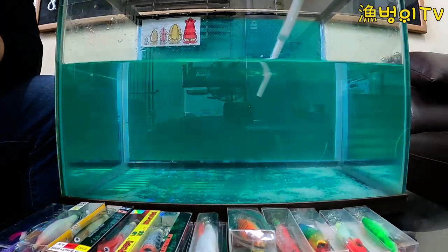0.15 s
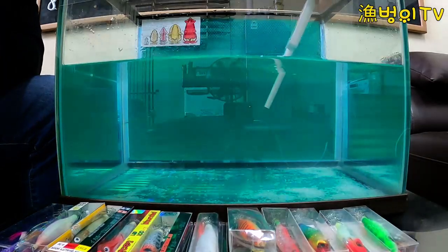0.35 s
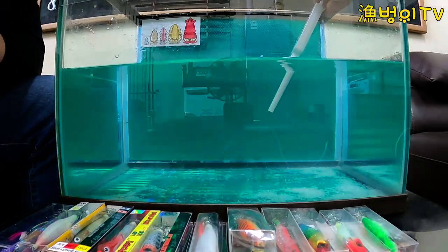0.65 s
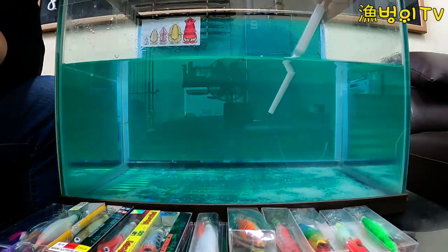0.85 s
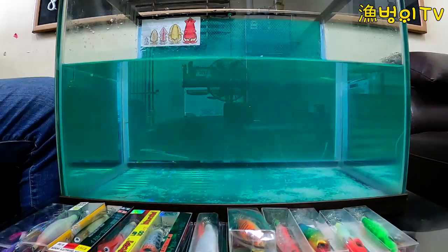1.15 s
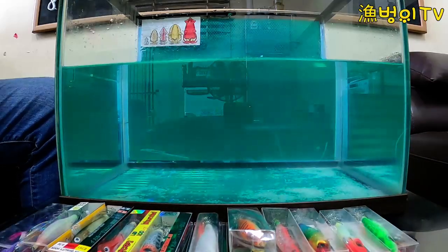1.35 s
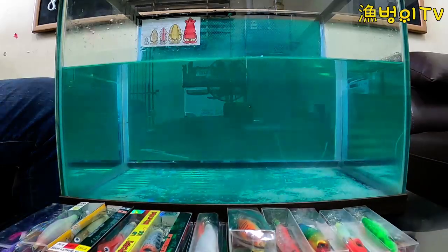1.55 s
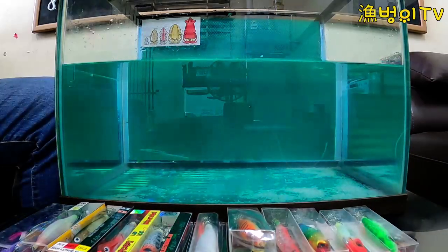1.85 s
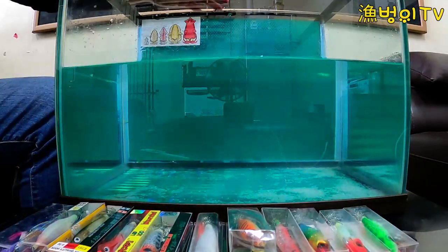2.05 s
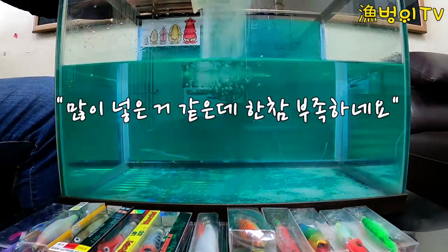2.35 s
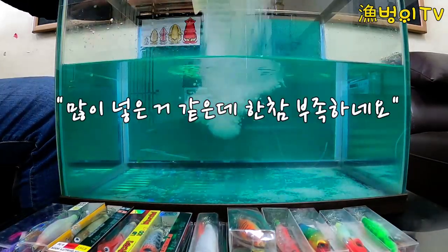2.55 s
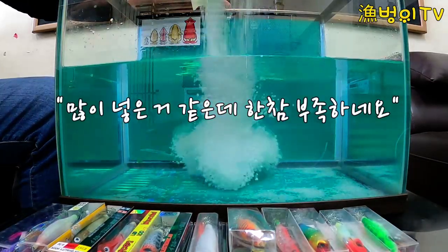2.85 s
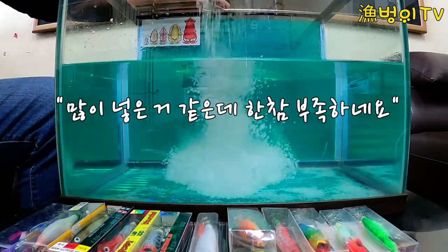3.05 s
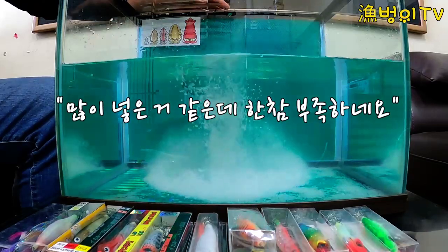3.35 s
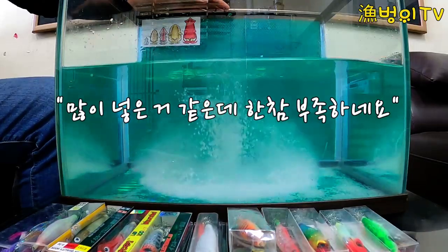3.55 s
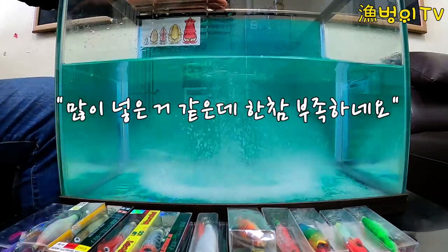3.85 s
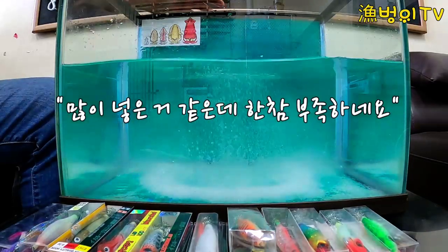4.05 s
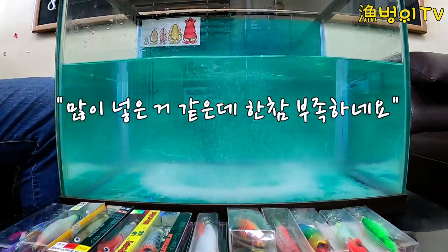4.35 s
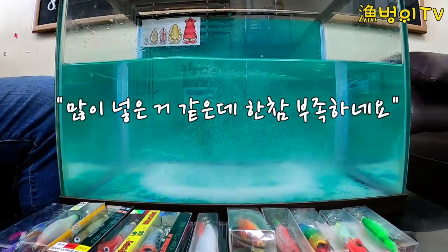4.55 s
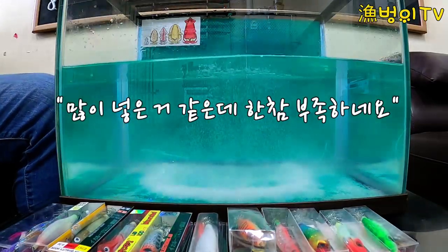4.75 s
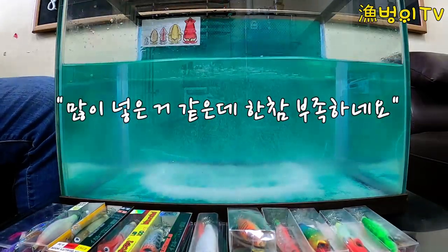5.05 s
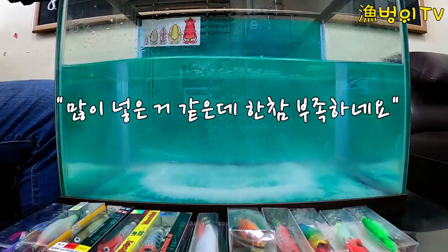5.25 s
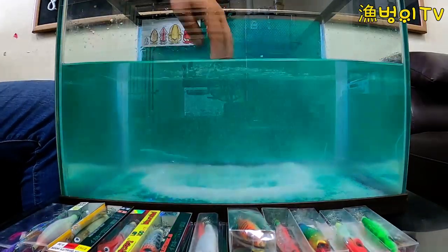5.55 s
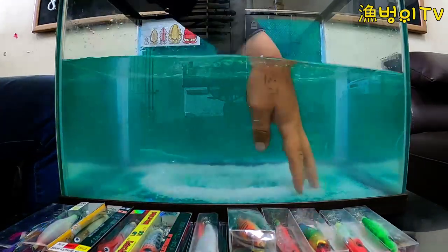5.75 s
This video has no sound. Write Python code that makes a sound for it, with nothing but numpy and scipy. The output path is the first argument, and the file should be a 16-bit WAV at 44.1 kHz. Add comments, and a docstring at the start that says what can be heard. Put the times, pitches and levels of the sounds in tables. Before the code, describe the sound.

Stiff paper knocks and rustles, then a rush of salt hisses into water with a few gulps, ending in two short shakes.

```python
"""Salt poured into water

Salt is tipped from a stiff paper container into a glass tank of water in a small room. Grain impacts fuse into
a hiss and drag down a few big bubbles, which ring as resonators; stray lumps tick, and the rest is shaken out.
The container rustles by friction and knocks in its own modes of vibration. The room rumbles and hums. Twice the
sound drops out for a moment."""
import sys
import numpy as np
from scipy import signal
from scipy.fft import rfft, irfft
from scipy.io import wavfile
from scipy.ndimage import uniform_filter1d

SR = 44100
rng = np.random.default_rng(int(sys.argv[2]) if len(sys.argv) > 2 else 0)


def output_pcm(signal):
    """Save a mono or channel-first signal as 16-bit PCM at the path in sys.argv[1].

    Samples are clipped to [-1, 1] before scaling.
    """
    pcm = np.clip(np.atleast_2d(signal).T, -1, 1) * 32767
    wavfile.write(sys.argv[1], SR, np.round(pcm).astype(np.int16))


N = 260190
TIME = np.arange(N) / SR
FREQS = np.maximum(np.arange(N // 2 + 1) * SR / N, 1)

POUR_START_S, SPLASH_S, POUR_EMPTY_S, POUR_END_S = 1.843, 2.1, 3.042, 3.8
# Spectral envelope of the falling stream: frequency_hz, gain_db
STREAM_SPECTRUM = [(150, -8), (500, -3), (950, -4.5), (1400, -1), (2700, -2), (5800, -3), (7800, -2.5),
                   (9000, -17.5), (10800, -23), (11600, -32.5), (13000, -28), (15500, -50)]
# Resonances of the churning bubble cloud: centre_hz, width_hz, gain_db
CLOUD_RESONANCES = [(575, 48, 7), (990, 43, -7), (1420, 45, 5.5), (1924, 450, 6), (2334, 250, 5),
                    (2640, 250, -2.5), (3430, 430, 5), (3930, 270, 5), (4500, 180, 2.5), (5750, 300, 1),
                    (6250, 450, -2), (6850, 280, 3)]
def stream(level_db=-23, trickle_db=-44.5, ping_db=-8.5, churn_db=-40, forerun_db=-2, inertia_s=0.39):
    """Superposition of impacts: fine grains fuse into hiss, coarse ones ping; trapped air churns."""
    tipped = surge(POUR_EMPTY_S, build_db_per_s=6.5, fall_db_per_s=54)
    tipped = uniform_filter1d(tipped, size=int(inertia_s * SR))
    flow = np.hypot(tipped, from_db(trickle_db - level_db))
    hits = grains(69000 * flow, spread_db=0, clump_db=1.1)
    hiss = colour(rms_one(hits) + from_db(ping_db) * pings(), STREAM_SPECTRUM)
    hiss = resonate(hiss, [(*peak, 0) for peak in CLOUD_RESONANCES], waver=0.015, size=1024)
    churn = from_db(churn_db) * flow ** 1.55 * noise_band(254, 296)
    gate = opening(POUR_START_S, fade_s=0.082) * (1 - opening(POUR_END_S))
    forerun = from_db(forerun_db * (1 - opening(SPLASH_S)))  # quieter ahead of the first mass of salt
    return gate * forerun * (from_db(level_db) * flow * hiss + churn)


def pings(count=14000, size=400, low_hz=1250, high_hz=8000, ring_cycles=24):
    """Bubble resonance: each coarse grain traps a tiny bubble that rings at its own pitch; rms 1."""
    when, pitch, strength = rng.random((count, 3)).T[:, :, None]
    cycles = (low_hz + pitch * (high_hz - low_hz)) * TIME[:size]
    height = strength ** 2 * np.sqrt(cycles[:, 1:2])  # offsets the shorter ring of high pitches
    waves = height * np.sin(2 * np.pi * cycles) * from_db(-60 * cycles / ring_cycles)
    at = (when * (N - size)).astype(int) + np.arange(size)
    return rms_one(np.bincount(at.ravel(), waves.ravel(), N))


# Resonances of the splash: centre_hz, width_hz, gain_db
SPLASH_RESONANCES = [(2040, 450, 9.4), (3780, 390, 11)]
def splash(level_db=-27):
    """Air entrainment: the first mass of salt breaks the surface and rings in two broad bands."""
    bubbles = colour(pings(), STREAM_SPECTRUM, SPLASH_RESONANCES)
    return from_db(level_db) * stroke(SPLASH_S, rise_s=0.026, t60_s=0.22) * bubbles


# Big bubbles dragged under: start_s, pitch_hz, level_db, t60_s
BIG_BUBBLES = [(1.894, 276, -24, 0.13), (1.924, 521, -18.5, 0.057), (2.135, 267, -25, 0.076),
               (2.748, 290, -18.5, 0.15), (2.809, 331, -19, 0.092)]
def gulps(chirp_per_s=0.39, swell_s=0.005):
    """Damped oscillation: big bubbles ring unsteadily, rising in pitch as they near the surface."""
    out = np.zeros(N)
    for start_s, pitch_hz, level_db, t60_s in BIG_BUBBLES:
        t = np.clip(TIME - start_s, 0, 1)
        envelope = from_db(level_db - 60 * t / t60_s) * (1 - np.exp(-t / swell_s))
        wobble = 0.6 * drift(70)
        out += envelope * np.sin(2 * np.pi * pitch_hz * t * (1 + chirp_per_s * t) + wobble)
    return out


# Spectral envelope of the last salt, also of lone grains and fizz: frequency_hz, gain_db
DREGS_SPECTRUM = [(150, -17), (500, -15), (1100, -3), (1600, 1.5), (3000, -3), (5700, -3.5), (7500, -5.5),
                  (9000, -17.5), (11000, -28.5), (11800, -37), (13000, -33), (15500, -50)]
# The mouth's resonances in the first shake: centre_hz, width_hz, gain_db, glide_hz_per_s
FIRST_MOUTH = [(947, 220, -13, 3), (1400, 360, -2, -500), (2340, 270, 1, -1500), (3380, 540, 4.5, -700),
               (4260, 420, -3.5, 0), (4900, 560, 4, -1500), (5800, 860, -5, 0), (6900, 610, 6, 1500)]
# The same, tipped further for the second: centre_hz, width_hz, gain_db, glide_hz_per_s
SECOND_MOUTH = [(890, 350, 5, -800), (1300, 950, -10.5, 0), (1800, 200, 6.5, -300), (2700, 380, 1.5, -1500),
                (4800, 400, -3, 0), (5400, 700, -2, 0), (6900, 750, 3, 9000)]
# Surges of shaken salt: peak_s, build_db_per_s, hold_s, hiss_db, relative_lows_db, sag_db_per_s
SHAKE_SURGES = [(3.972, 126, 0.078, -22, -6, 38.5), (4.156, 175, 0.097, -27, -4, 7)]
def shakes(crinkle_db=1.5, crinkle_hz=150):
    """Source and filter: two crinkling surges of salt are coloured by the container's flexing mouth."""
    out = np.zeros(N)
    for shake, mouth in zip(SHAKE_SURGES, (FIRST_MOUTH, SECOND_MOUTH)):
        peak_s, build_db_per_s, hold_s, hiss_db, lows_db, sag_db_per_s = shake
        sag = from_db(-sag_db_per_s * np.clip(TIME - peak_s, 0, hold_s))
        flow = sag * surge(peak_s, build_db_per_s, fall_db_per_s=131, hold_s=hold_s)
        hits = grains(50000 * np.maximum(flow, 0.1), spread_db=-0.5, clump_db=0.6)
        crinkle = colour(hits * from_db(crinkle_db * drift(crinkle_hz)), DREGS_SPECTRUM)
        salt = resonate(crinkle, mouth, waver=0.017, middle_s=peak_s + hold_s / 2)
        lows = from_db(lows_db) * rms_one(band(salt, 220, 1224))
        out += from_db(hiss_db) * flow * (rms_one(band(salt, 890, 20000)) + lows)
    return out


def dregs(level_db=-33):
    """Shot noise: a thin dribble, filtered by the mouth, runs on through both shakes."""
    hits = colour(grains(9000, spread_db=-0.5, clump_db=2.5), DREGS_SPECTRUM)
    dribble = resonate(hits, FIRST_MOUTH, waver=0.017, middle_s=SHAKE_SURGES[0][0])
    return from_db(level_db) * stroke(3.688, rise_s=0.16, t60_s=0.46, hold_s=0.47) * dribble


# Stray lumps of salt: start_s, level_db, t60_s, pitch_hz
LUMPS = [(3.4198, -21.5, 0.016, 6900), (3.432, -34, 0.044, 3200), (3.444, -32, 0.051, 2920),
         (3.5952, -36, 0.016, 4900), (3.639, -33, 0.025, 2030), (3.6735, -34, 0.024, 4770),
         (3.698, -30, 0.015, 6900), (3.7238, -38, 0.014, 4800), (3.7575, -36, 0.016, 6900)]
def ticks():
    """Impact transients: each stray lump makes a brief, and therefore broadband, tick."""
    return sum(burst(*lump, rise_s=0.00037, low_hz=1460, high_hz=7200) for lump in LUMPS)


def lone_grains(per_s=110, level_db=-50):
    """Sparse random impacts: single grains patter as the stream thins out."""
    hits = colour(grains(per_s, spread_db=0.5, clump_db=1), DREGS_SPECTRUM)
    gate = opening(POUR_EMPTY_S) * (1 - opening(POUR_END_S))
    return from_db(level_db) * gate * rms_one(band(hits, 2800, 7600, order=2))


# Knocks of the container:
# start_s, level_db, relative_thump_db, tilt_db_per_octave, thump_hz, pitch_ratio, relative_crack_db
CONTAINER_KNOCKS = [(1.111, -38, 19, -5, 240, 1.1, 0), (1.1462, -21, 3.5, 6.5, 380, 0.98, 0),
                    (1.2655, -30, 16, 3, 260, 1.1, 8), (1.281, -38, 17, 2, 175, 0.79, 0),
                    (1.3, -35.5, -10, 9, 400, 1.05, 4), (1.3146, -23, 0, 4.5, 500, 0.87, 10),
                    (1.404, -28, -16, -3, 400, 1.01, 10), (1.431, -25.5, 0.5, -2.5, 420, 0.93, 16),
                    (1.509, -26.5, -3, -2, 530, 1.05, 10), (1.660, -34.5, 14, 8, 310, 1.12, 6),
                    (1.776, -18.5, -4, 3.5, 520, 1, 4), (2.074, -17.5, 4.5, -10, 523, 0.94, 25),
                    (2.1062, -25, 16, 2, 221, .95, 8), (3.5075, -23, 7.5, 3, 590, 0.863, 27.5),
                    (3.5098, -28, 19, 3.5, 100, 0.99, 18), (4.7284, -34, -6, -10, 480, .8, 14)]
def knocks(wall_lag_s=0.0015):
    """Buckling and impact: a crease of the container clacks, and its wall answers with a thump."""
    out = np.zeros(N)
    for start_s, level_db, thump_db, tilt, thump_hz, pitch_ratio, crack_db in CONTAINER_KNOCKS:
        wall = from_db(thump_db) * thump(thump_hz)
        crease = clack(tilt, pitch_ratio, crack_db)
        for onset_s, sound in ((start_s, crease), (start_s + wall_lag_s, wall)):
            at = int(onset_s * SR)
            out[at:at + len(sound)] += from_db(level_db) * sound
    return band(out, 45, 10500, order=4)


# Modes of the paper wall: pitch_hz, gain_db, t60_s
WALL_MODES = [(108, -9, 0.025), (158, -3.5, 0.022), (264, 1.5, 0.023), (400, -3, 0.025), (570, -1, 0.024),
              (774, -7, 0.024)]
def thump(centre_hz, falloff_db_per_octave=9.5):
    """Modal vibration: the wall's modes ring together, driven hardest near one frequency."""
    out = 0
    for k, (pitch_hz, gain_db, t60_s) in enumerate(WALL_MODES):
        gain = from_db(gain_db - falloff_db_per_octave * abs(np.log2(pitch_hz / centre_hz)))
        out += (-1) ** k * gain * ring(push(crumple=0.032, crumple_s=0.011), pitch_hz, t60_s)
    return out


# Modes of a crease: base_pitch_hz, gain_db, t60_s
CREASE_MODES = [(1354, -2.5, 0.014), (1920, 5.5, 0.0099), (2110, 0, 0.008), (3000, -4.5, 0.0065),
                (4050, -0.5, 0.0042), (4970, 0.5, 0.005), (6130, -6.5, 0.0043), (7000, -6, 0.005)]
def clack(tilt_db_per_octave, pitch_ratio, crack_db, build_t60_s=0.0034, snap_db=-6):
    """Impulsive excitation: a crease snaps with a broad crack, then its modes swell and die quickly."""
    force = push(crumple=0.11, crumple_s=0.0016)
    out = from_db(crack_db) * band(force, 700, 4400) + from_db(snap_db + 2 * tilt_db_per_octave) * force
    drive_gain = 2 * np.log(1000) / (build_t60_s * SR)  # offsets the gain of resonant build-up
    for k, (base_hz, gain_db, t60_s) in enumerate(CREASE_MODES):
        pitch_hz = pitch_ratio * base_hz
        drive = drive_gain * ring(push(crumple=0.069, crumple_s=0.002), pitch_hz, build_t60_s)
        gain = from_db(gain_db + tilt_db_per_octave * np.log2(base_hz / 1800))
        out += (-1) ** k * gain * ring(drive, pitch_hz, t60_s)
    return out


MOVE_SPAN_S = (1.75, 2.0)  # the container moves from close on the right to over the tank
# Spectral envelope of salt rubbing on paper: frequency_hz, gain_db
RUB_SPECTRUM = [(60, 4.5), (200, 1.5), (700, 2), (1200, 1.5), (1850, 4), (2600, 0.5), (4000, 4.5),
                (5700, -2), (7200, 0), (8800, -14), (11000, -21), (12000, -23), (15500, -18)]
# Resonances of the bending paper: centre_hz, width_hz, gain_db
PAPER_RESONANCES = [(1800, 400, 3), (3500, 600, 2)]
# Slides of salt in the container: start_s, rise_s, rasp_db, relative_wall_db, relative_hiss_db
SALT_SLIDES = [(1.074, 0.024, -43, 1.5, -5.5), (1.149, 0.017, -37, -2, -8.5), (1.222, 0.049, -35, 1.5, -4),
               (1.292, 0.026, -30.5, -4.5, -10), (1.503, 0.025, -36.5, -3.5, -1.5),
               (1.65, 0.0054, -37, -3.5, 0), (1.777, 0.04, -34, -1.5, -2.5), (1.889, 0.044, -36, -2.5, 1),
               (4.726, 0.0073, -36, -1, -15.5), (4.81, 0.052, -32.5, 1, 2), (4.856, 0.03, -26.5, 0, -8),
               (5.03, 0.0069, -34.5, -11, -12), (5.203, 0.0091, -29, -3.5, -12)]
def slides(wall_side_db=-12, grit_side_db=-18):
    """Sliding friction: salt rubs along the paper; the broad wall drums, the grains rasp and hiss."""
    wall, rasp, hiss = np.zeros((3, N))
    for start_s, rise_s, rasp_db, wall_db, hiss_db in SALT_SLIDES:
        t60_s = 0.46 * 2 ** ((-27.5 - rasp_db) / 25)  # a harder slide is over sooner
        level = from_db(rasp_db) * stroke(start_s, rise_s, t60_s)
        wall = np.hypot(wall, level * from_db(wall_db))
        rasp = np.hypot(rasp, level)
        hiss = np.hypot(hiss, level * from_db(hiss_db))
    mid, side = (colour(grains(11000, spread_db=0, clump_db=1), RUB_SPECTRUM) for _ in range(2))
    mid = resonate(mid, [(*peak, 0) for peak in PAPER_RESONANCES], waver=0.1)
    width_db = np.interp(TIME, MOVE_SPAN_S, [6.5, -5])  # wide while close, narrower over the tank
    side = side * from_db(width_db) * [[1], [-1]]
    grit = mid + from_db(grit_side_db) * side
    return (wall * rms_one(band(mid + from_db(wall_side_db) * side, 99, 1074))
            + rasp * rms_one(band(grit, 1134, 3040))
            + hiss * rms_one(band(grit, 4450, 11800)))


# Catches of the paper: start_s, level_db, t60_s, pitch_hz
PAPER_CATCHES = [(4.766, -42, 0.39, 1400), (5.037, -31.5, 0.16, 1930), (5.207, -27, 0.07, 1900),
                 (5.225, -30, 0.11, 1060)]
def scrapes():
    """Friction transients: the paper catches and scrapes."""
    return sum(burst(*catch, rise_s=0.003, low_hz=800, high_hz=6000) for catch in PAPER_CATCHES)


# Faint squeaks of rubbing: start_s, length_s, pitch_hz, level_db
RUB_SQUEAKS = [(0.04, 0.48, 2160, -62), (5.596, 0.16, 2070, -53), (5.654, 0.036, 3250, -56)]
def squeaks(width_hz=320):
    """Narrow-band resonance: friction excites a single band of noise."""
    out = np.zeros(N)
    for start_s, length_s, pitch_hz, level_db in RUB_SQUEAKS:
        swell = np.interp((TIME - start_s) / length_s, [0, 0.1, 0.5, 1], [0, 1, 1, 0])
        out += from_db(level_db) * swell * noise_band(pitch_hz - width_hz / 2, pitch_hz + width_hz / 2)
    return out


# Shudders of the tank, the strongest as the first mass of salt lands: start_s, level_db
TANK_SHUDDERS = [(-0.03, -40.5), (2.11, -39.5), (4.85, -44.5)]
def booms():
    """Panel vibration: the glass walls shudder at low frequency."""
    shudder = sum(from_db(level_db) * stroke(start_s, rise_s=0.076, t60_s=1.2)
                  for start_s, level_db in TANK_SHUDDERS)
    return shudder * noise_band(42, 95)


def fizz(pops, level_db=-44):
    """Bubble noise: fine bubbles rise from the sunken salt in a fizz that swells and dies away."""
    envelope = opening(4.38) * surge(5.27, build_db_per_s=10.5, fall_db_per_s=63)
    return from_db(level_db) * envelope * colour(pops, DREGS_SPECTRUM)


# Spectral envelope of stirred water: frequency_hz, gain_db
SWISH_SPECTRUM = [(900, -12), (1500, 3), (2150, 1.5), (2600, -2.5), (3500, 0.5), (5600, -2), (7000, 2),
                  (8300, -4.5), (9500, -15), (15000, -33)]
# Stirrings of the water: start_s, level_db
STIRS = [(-0.04, -56.5), (5.61, -58.5)]
def swishes(pops):
    """Flow noise: the tiny pops of stirred water merge into faint swishes."""
    stirring = sum(from_db(level_db) * stroke(start_s, rise_s=0.016, t60_s=1.5, hold_s=0.21)
                   for start_s, level_db in STIRS)
    return stirring * colour(pops, SWISH_SPECTRUM)


def tail_and_hiss(x, t60_s=0.14, wet_db=-13, side_db=-13, wide_hiss_db=4):
    """Diffuse reverberation: a short room tail; a faint, wide treble hiss is added to it."""
    t = TIME[:SR // 2]
    decay = from_db(-60 * t / t60_s) * (t > 0.004)
    mid, side = band(rng.standard_normal((2, len(t))), 67, 20200, order=1) * decay
    wide_hiss = from_db(wide_hiss_db) * band(side, 10800, 17400, order=2)
    side = from_db(side_db) * side + wide_hiss
    response = (mid + side * [[1], [-1]]) / np.sqrt(np.sum(mid ** 2))
    return from_db(wet_db) * signal.fftconvolve(x[None], response, axes=1)[:, :N]


# Spectral envelope of the room noise: frequency_hz, gain_db
ROOM_SPECTRUM = [(20, -24), (45, -2.5), (100, -3.5), (165, -4.5), (240, 0.5), (330, -4.5), (470, -3),
                 (700, -11.5), (1000, -20.5), (1700, -21), (3200, -36), (5600, -44), (7000, -36.5),
                 (10000, -59), (15000, -61)]
def room_tone(noise_db=-43.5, side_db=-46, rumble_db=-52.5, hum_db=-50, hum_hz=61.6):
    """Ambient noise floor: dull noise, deep rumble and a wavering mains hum, alike on both sides."""
    mid, side = (colour(white, ROOM_SPECTRUM) for white in rng.standard_normal((2, N)))
    rumble = from_db(rumble_db + 2 * drift(2)) * noise_band(28, 90)
    hum = from_db(hum_db + 0.91 * drift(14)) * np.sqrt(2) * np.sin(2 * np.pi * hum_hz * TIME)
    return from_db(noise_db) * (mid + from_db(side_db) * side * [[1], [-1]]) + rumble + hum


def grains(per_s, spread_db, clump_db):
    """Shot noise: uneven, clumped impacts, at most one a sample; mean power is the same at any rate."""
    chance = np.clip(per_s / SR, 1e-4, 1)
    sizes = rng.standard_normal(N) * from_db(spread_db * np.minimum(rng.exponential(1, N), 4))
    hits = (rng.random(N) < chance) * sizes / np.sqrt(chance)
    return hits * from_db(clump_db * drift(35))


def burst(start_s, level_db, t60_s, pitch_hz, rise_s, low_hz, high_hz, focus_db=-2):
    """Noise transient: a gritty burst, broad but strongest around one pitch."""
    grit = rng.standard_normal(N)
    broad = rms_one(band(grit, low_hz, high_hz, order=4))
    focus = from_db(focus_db) * rms_one(band(grit, pitch_hz / 1.14, pitch_hz * 1.03, order=2))
    return from_db(level_db) * stroke(start_s, rise_s, t60_s) * rms_one(broad + focus)


def push(crumple, crumple_s):
    """Impulsive force: a click with a short crumple after it."""
    t = TIME[:SR // 5]
    return (t == 0) + crumple * rng.standard_normal(len(t)) * np.exp(-t / crumple_s)


def ring(force, pitch_hz, t60_s):
    """Damped resonator: a unit click sets a sine of height 1 ringing."""
    radius, angle = from_db(-60 / (t60_s * SR)), 2 * np.pi * pitch_hz / SR
    return signal.lfilter([0, np.sin(angle)], [1, -2 * radius * np.cos(angle), radius ** 2], force + 1e-18)


def resonate(x, resonances, waver, middle_s=0, size=512, tip_s=0.078):
    """Time-varying filter: resonances waver by a share of their pitch and glide about middle_s; rms 1."""
    hz, t, frames = signal.stft(x, SR, nperseg=size)
    tipping_s = np.clip(t - middle_s, -tip_s, tip_s)
    shape_db = 0
    for centre_hz, width_hz, gain_db, glide_hz_per_s in resonances:
        wander = 1 + waver * np.interp(t, TIME, drift(12))
        moving_hz = (centre_hz + glide_hz_per_s * tipping_s) * wander
        shape_db += gain_db / (1 + (2 * (hz[:, None] - moving_hz) / width_hz) ** 4)
    return rms_one(signal.istft(frames * from_db(shape_db), SR)[1][:N])


def colour(x, spectrum, resonances=()):
    """Spectral shaping: a smooth envelope with steady resonances on top; rms 1."""
    hz, db = np.transpose(spectrum)
    shape_db = np.interp(np.log(FREQS), np.log(hz), db)
    for centre_hz, width_hz, gain_db in resonances:
        shape_db += gain_db / (1 + (2 * (FREQS - centre_hz) / width_hz) ** 4)
    return rms_one(irfft(rfft(x) * from_db(shape_db), N))


def drift(rate_hz):
    """Random modulation: low-passed noise; rms 1."""
    return rms_one(irfft(rfft(rng.standard_normal(N)) / (1 + (FREQS / rate_hz) ** 2), N))


def noise_band(low_hz, high_hz):
    """Band-limited noise; rms 1."""
    return rms_one(band(rng.standard_normal(N), low_hz, high_hz, order=2))


def band(x, low_hz, high_hz, order=3):
    """Butterworth band-pass."""
    edges_hz = [low_hz, min(high_hz, 0.45 * SR)]
    return signal.sosfilt(signal.butter(order, edges_hz, "band", fs=SR, output="sos"), x)


def stroke(start_s, rise_s, t60_s, hold_s=0):
    """Envelope with linear rise, hold and exponential decay."""
    t = np.maximum(TIME - start_s, 0)
    return np.minimum(t / rise_s, 1) * from_db(-60 * np.maximum(t - rise_s - hold_s, 0) / t60_s)


def surge(peak_s, build_db_per_s, fall_db_per_s, hold_s=0):
    """Envelope with exponential growth to 1, hold and exponential decay."""
    before_s, after_s = np.maximum(peak_s - TIME, 0), np.maximum(TIME - peak_s - hold_s, 0)
    return from_db(-build_db_per_s * before_s - fall_db_per_s * after_s)


def opening(start_s, fade_s=0.04):
    """Linear gate from 0 to 1."""
    return np.clip((TIME - start_s) / fade_s, 0, 1)


def from_db(db):
    """Decibels to amplitude ratio."""
    return 10 ** (np.asarray(db) / 20)


def rms_one(x):
    """Normalisation to unit rms."""
    return x / np.sqrt(np.mean(x ** 2) + 1e-20)


def scene(held_pan_db=-1.3):
    """Superposition: the pour in front, the container a little to the right at first, and the room."""
    salt = stream() + splash() + ticks() + lone_grains() + dregs() + shakes()
    pops = grains(12000, spread_db=-2.5, clump_db=-1.3)
    centre = salt + swishes(pops) + fizz(pops) + squeaks() + gulps() + booms()
    pan_db = np.interp(TIME, MOVE_SPAN_S, [held_pan_db, 0])  # left minus right
    container = (slides() + scrapes() + knocks()) * from_db(pan_db * [[0.5], [-0.5]])
    return centre + container + tail_and_hiss(centre + container.mean(axis=0)) + room_tone()


# Moments of silence: start_s, end_s
SILENT_SPANS = [(.987, 1.065), (5.503, 5.540)]
def record(dry, stopband_hz=16600):
    """Gating and band-limiting: the sound drops out twice, and the top treble is cut."""
    silent = sum((TIME > start_s) & (TIME < end_s) for start_s, end_s in SILENT_SPANS)
    gate = uniform_filter1d(1.0 - silent, size=40)
    return signal.sosfilt(signal.cheby2(12, 70, stopband_hz, fs=SR, output="sos"), dry * gate)


dry = scene()
out = record(dry)
output_pcm(out)
```